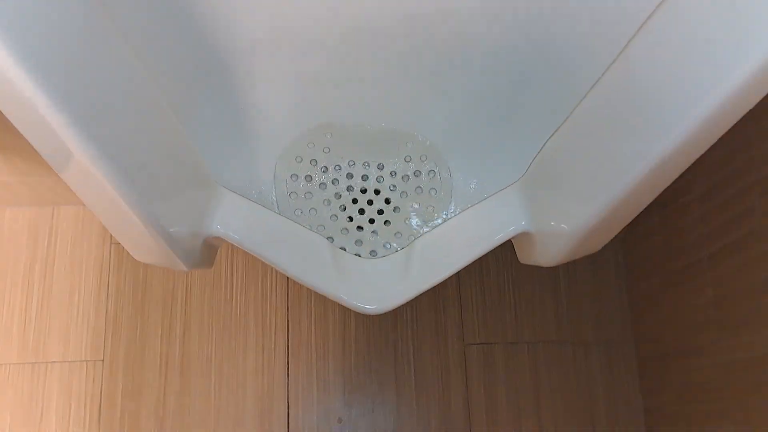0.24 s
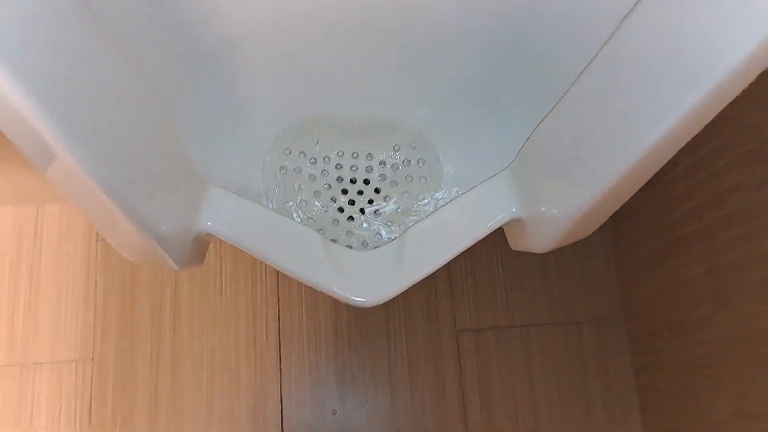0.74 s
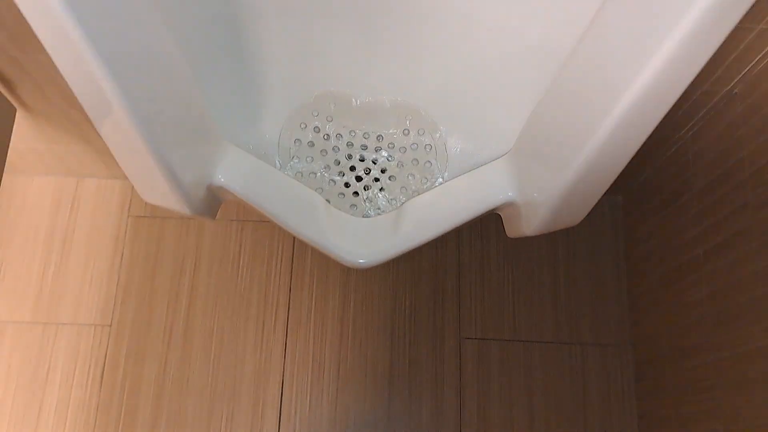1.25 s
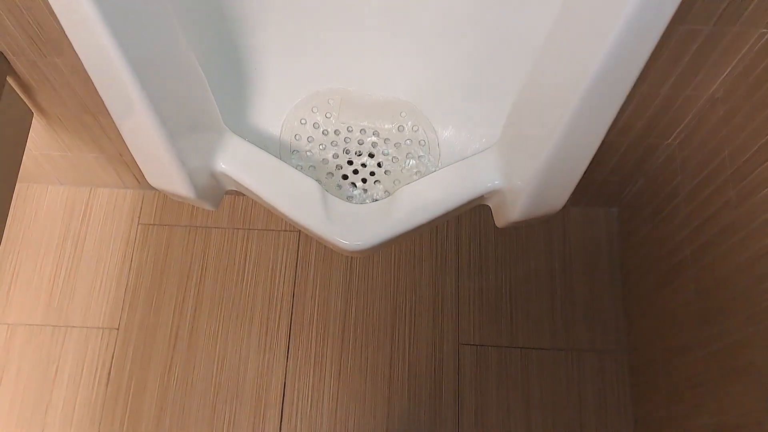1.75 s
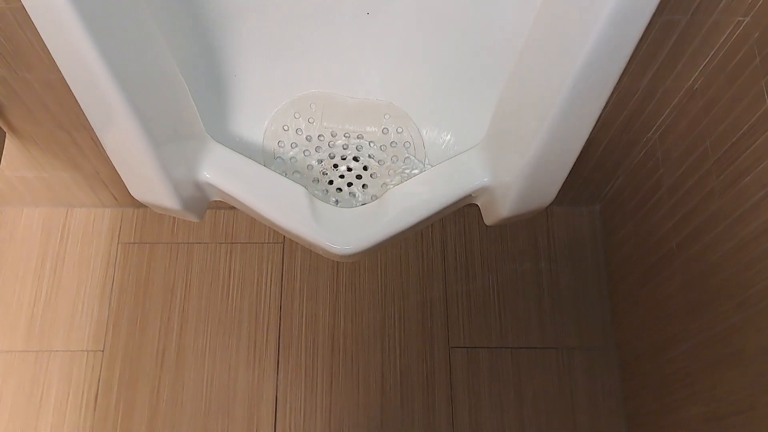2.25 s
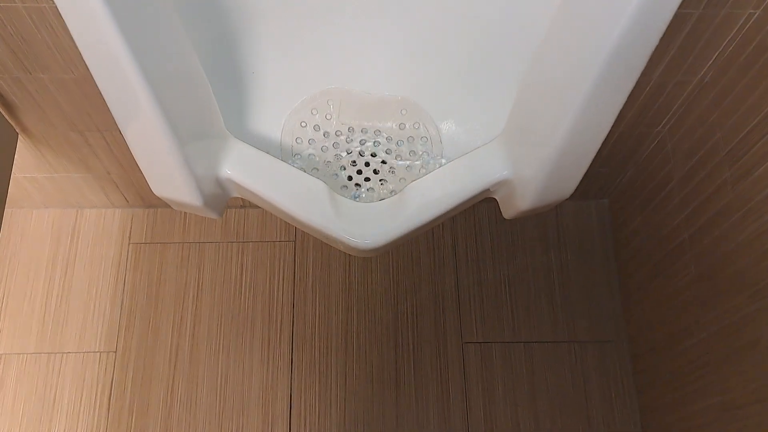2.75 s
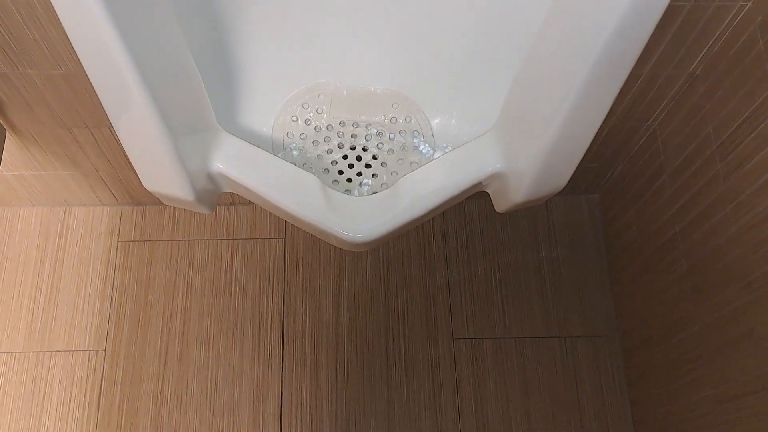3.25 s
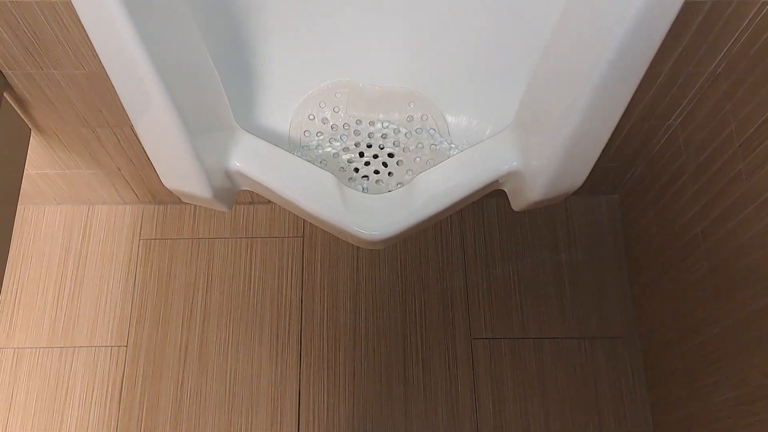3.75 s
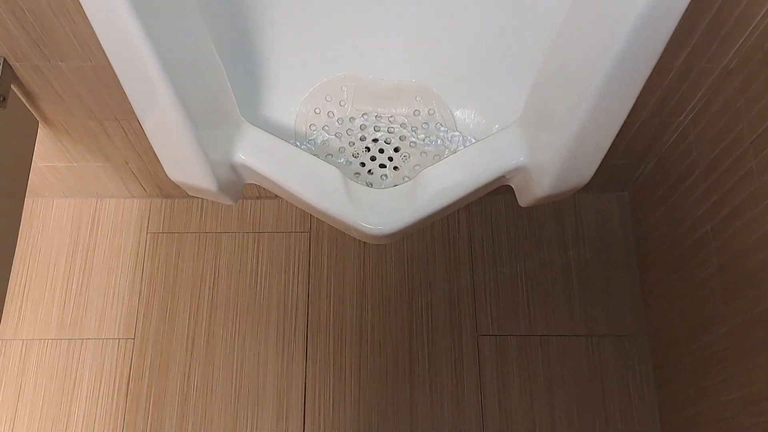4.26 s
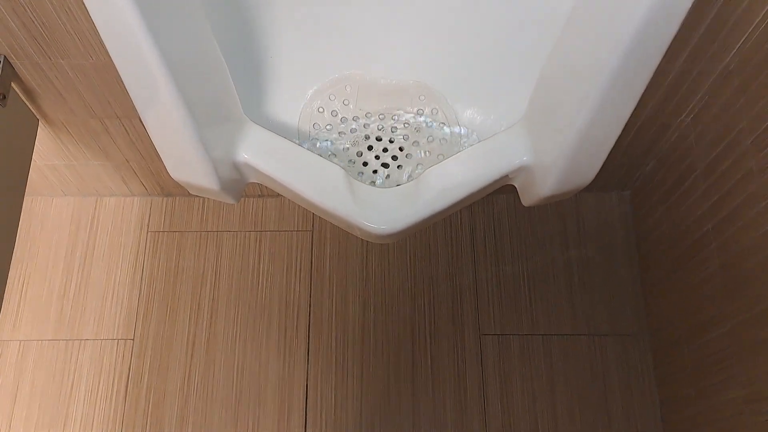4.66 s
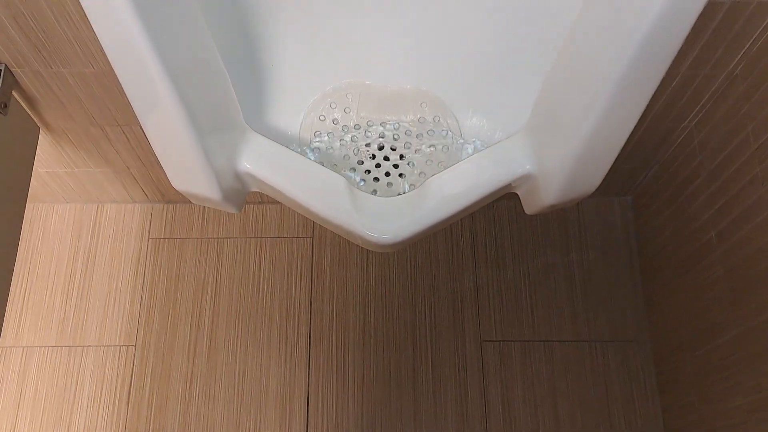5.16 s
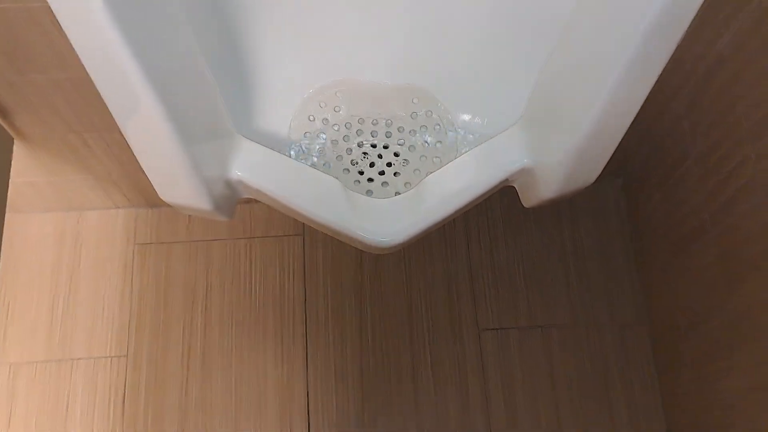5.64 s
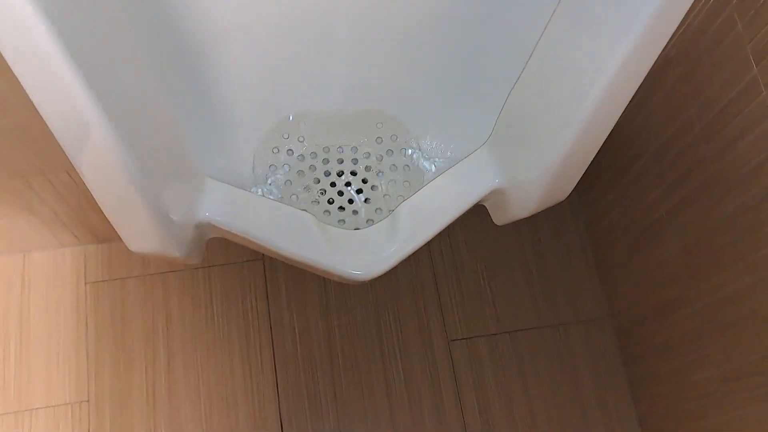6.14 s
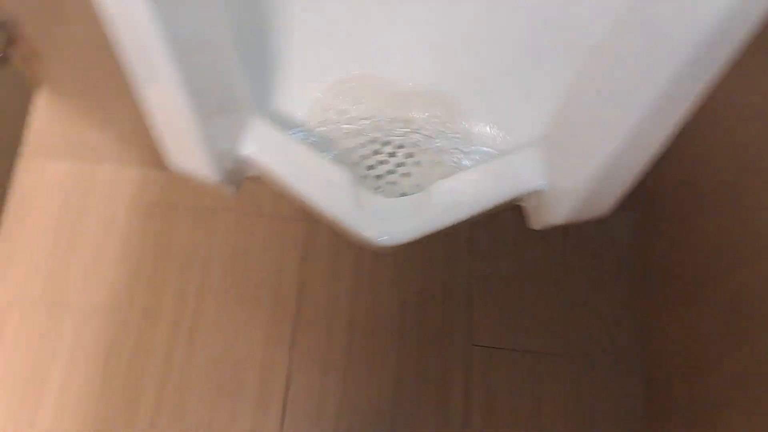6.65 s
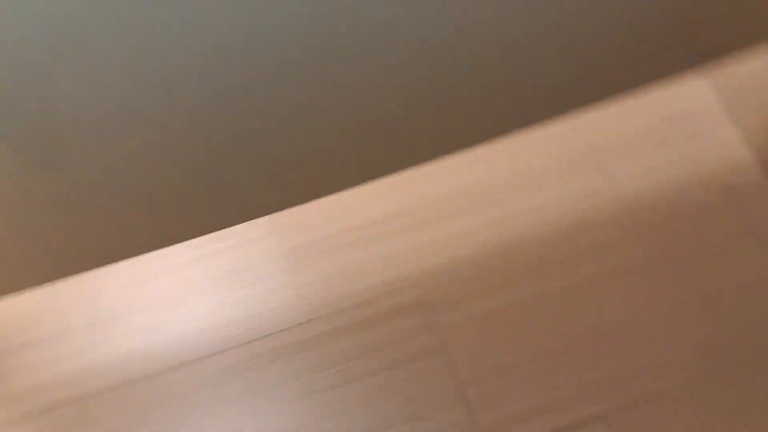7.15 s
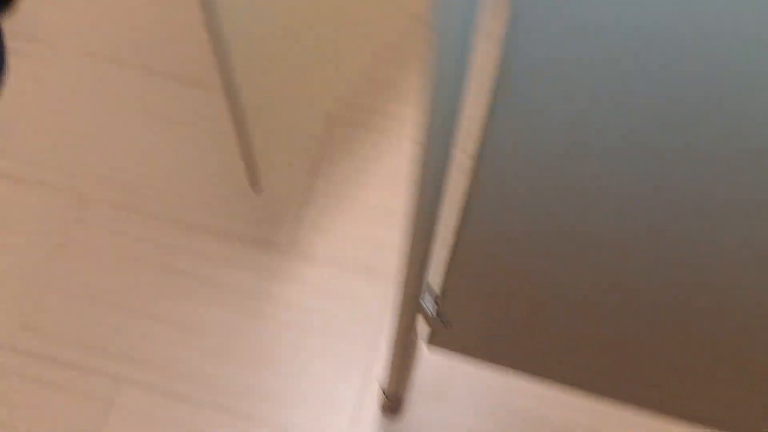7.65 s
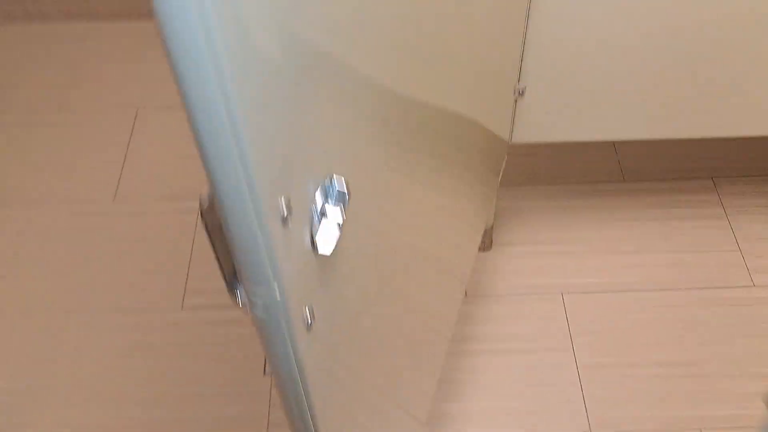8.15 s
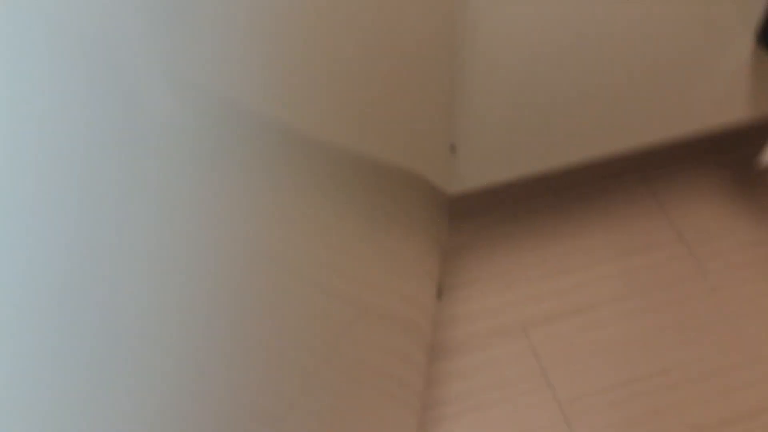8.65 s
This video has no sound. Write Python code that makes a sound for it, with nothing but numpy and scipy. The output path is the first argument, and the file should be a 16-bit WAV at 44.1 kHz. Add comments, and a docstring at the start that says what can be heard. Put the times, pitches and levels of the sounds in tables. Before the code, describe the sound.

A urinal flush valve hisses and whistles over dripping water, shuts off, the drain gulps and glugs, then shoes scuff and a stall door bumps.

```python
"""A tiled restroom with a urinal: the flush valve hisses and whistles while water drips, then it shuts.
The hiss is shaped noise, the whistles are noise in narrow resonances, and the drips are dying sines.
The trap gulps air: blows ring the drain pipe in hollow glugs, and swarms of bubbles make bright splashes.
Then shoes and a hand scuff (grainy noise) and a stall door ticks and bumps (short rings and a boom).
Under it all lies a low rumble of room air, made of low noise, swelling while the trap drains."""
import sys
import numpy as np
from scipy import signal
from scipy.fft import rfft, irfft, next_fast_len
from scipy.io import wavfile
from scipy.ndimage import uniform_filter1d

SR = 44100
rng = np.random.default_rng(int(sys.argv[2]) if len(sys.argv) > 2 else 0)


def generate_wav(sig):
    """Save sig (samples, or channels by samples) to the path in sys.argv[1] as 16-bit PCM at SR."""
    pcm = np.round(np.clip(np.atleast_2d(sig).T, -1, 1) * 32767).astype(np.int16)
    wavfile.write(sys.argv[1], SR, pcm)


N = 392490   # length in samples

# gulps of air in the trap: start_s, level_db, upper_modes_db (added to the level)
GULPS = [(5.231, -36.5, -15), (5.281, -44.5, 7), (5.322, -42.5, 6), (5.342, -41.5, 8), (5.386, -33, -1),
         (5.428, -25, -14), (5.486, -42, 4.5), (5.54, -26.5, -6), (5.564, -28.5, 5), (5.613, -30.5, 6.5),
         (5.656, -24, -13), (5.701, -19, -9), (5.748, -15.5, -8), (5.852, -24, -3), (5.948, -26, -9),
         (5.99, -34, 1), (6.119, -29, -32), (6.215, -24.5, -10.5), (6.263, -27, -9), (6.298, -32.5, 9),
         (6.365, -33, 2), (6.432, -30.5, -26), (6.486, -29, -38), (6.514, -34, -2), (6.587, -22.5, 0.5),
         (6.699, -39, 11), (6.74, -30, -25), (6.783, -22, -32), (7.103, -48, -20), (7.157, -36, -27)]
# splashes: start_s, level_db, large_bubbles_hz, small_bubbles_hz, small_bubbles_db, bright_edge_db
# (the last two are added to the level)
SPLASH_EVENTS = [(5.234, -68, 2580, 5200, 20.5, -15), (5.25, -50, 3710, 4390, 3.5, -1),
                 (5.32, -61.5, 2180, 5410, 7.5, -21), (5.3493, -47, 1890, 3900, -11, -2.5),
                 (5.368, -46, 1725, 4740, -30, -16), (5.3946, -48, 2940, 3820, -22, -37),
                 (5.4218, -64, 2670, 5400, 11, -11), (5.4528, -54.5, 1810, 4180, 4.5, 3.5),
                 (5.4867, -56.5, 1760, 5200, -1.5, -23), (5.545, -58, 1300, 5500, 1, -25),
                 (5.564, -46, 2230, 5570, 10, -5), (5.6162, -55.5, 1750, 5500, 12, -2),
                 (5.6536, -27.5, 2870, 3960, -1.5, -25), (5.707, -47, 2390, 4050, -8, -22),
                 (5.7437, -46.5, 2300, 5200, -2.5, -14), (5.843, -47, 1760, 6800, -2.5, -19),
                 (5.8576, -47.5, 1806, 4790, 6.5, 1), (5.901, -42.5, 1700, 4640, -24, -16),
                 (5.9436, -50.5, 1780, 4690, -7, -8.5), (5.9894, -59.5, 2310, 5390, 10.5, -4.5),
                 (5.97, -75, 2350, 4500, 0, 12), (6.004, -60, 1850, 4020, -1, 1),
                 (6.05, -60, 1640, 5180, 0, -20), (6.1178, -51.5, 2675, 5000, -18, -32),
                 (6.157, -53, 2265, 5500, -18, -22), (6.217, -50, 1870, 3670, -15, -12),
                 (6.144, -70, 3440, 6000, 1, -5), (6.237, -63, 3530, 7500, 4, 10),
                 (6.262, -51, 3170, 5880, -3, -14), (6.2983, -39, 1960, 7720, -0.5, 1),
                 (6.302, -39, 4740, 7800, 2.5, -10), (6.37, -56.5, 1690, 5400, -5.5, -4),
                 (6.492, -61, 2350, 5960, -2, -20), (6.514, -68, 2160, 5440, 11, -22),
                 (6.583, -54, 1820, 4940, -3, -14), (6.6076, -37, 2300, 5070, -4.5, -8),
                 (6.704, -54.5, 2260, 5450, -5.5, -0.5), (6.7844, -44, 2550, 4340, -24.5, -25),
                 (6.9, -68, 2550, 4530, -16, 6)]


def from_db(db):
    """Turn decibels into gain."""
    return 10 ** (np.asarray(db) / 20)


def mid_one(x):
    """Scale a sound so that the mean of its channels has rms 1."""
    return x / np.sqrt(np.mean(np.atleast_2d(x).mean(axis=0) ** 2) + 1e-20)


def in_time(rows, outside=None):
    """Draw straight lines between the rows of a table, giving each column a value at every sample."""
    s, *columns = np.transpose(rows)
    t = np.arange(N) / SR
    return [np.interp(t, s, column, outside, outside) for column in columns]


def at_hz(points, hz):
    """Read a spectrum table between its points, on a log-frequency axis."""
    point_hz, point_value = np.transpose(points)
    return np.interp(np.log(hz), np.log(point_hz), point_value)


def pan(db):
    """Give left and right gains for a left-minus-right level, held within 20 dB; their mean is 1."""
    left = 2 / (1 + from_db(-np.clip(db, -20, 20)))
    return np.array([left, 2 - left])


def drift(rate_hz):
    """Wander slowly at random around zero, with a spread of 1: low-passed noise."""
    step = 40   # computed on every 40th sample only
    r = np.exp(-2 * np.pi * rate_hz * step / SR)
    noise = rng.standard_normal(N // step + 2002)
    slow = signal.lfilter([1], [1, -2 * r, r * r], noise)[2000:]   # drop the filter's start
    return np.interp(np.arange(N) / step, np.arange(len(slow)), slow / slow.std())


def swells(s, db, rise_s, t60_s):
    """Add up the power of overlapping swells: each climbs 40 dB in rise_s, then falls 60 dB in t60_s."""
    step = 32   # computed on every 32nd sample only
    s, db, rise_s, t60_s = (np.reshape(value, (-1, 1)) for value in (s, db, rise_s, t60_s))
    t = np.arange(0, N, step)[None] / SR - s
    db_per_s = np.where(t < 0, 40 / rise_s, -60 / t60_s)
    power = np.sum(from_db(2 * (db + db_per_s * t)), axis=0)
    return np.interp(np.arange(N) / step, np.arange(len(power)), np.sqrt(power))


def coloured(spectrum, alike):
    """Make stereo noise with a given spectrum and left-right likeness, by shaping its frequencies."""
    size = next_fast_len(N)
    hz = np.maximum(np.arange(size // 2 + 1) * SR / size, 1)
    mid, side = rfft(rng.standard_normal((2, size)))
    likeness = np.clip(at_hz(alike, hz), -.95, .99)
    pair = np.sqrt(1 + likeness) * mid + np.sqrt(1 - likeness) * side * [[1], [-1]]
    return mid_one(irfft(pair * from_db(at_hz(spectrum, hz)), size)[:, :N])


def ring(x, hz, t60_s):
    """Pass a sound through a resonance: a unit click sets a dying sine of starting height 1 ringing."""
    r, w = from_db(-60 / (t60_s * SR)), 2 * np.pi * hz / SR
    return signal.lfilter([0, np.sin(w)], [1, -2 * r * np.cos(w), r * r], x + 1e-18)


def bubble(t, hz, t60_s, rise):
    """Sound a trapped bubble: a dying sine whose pitch climbs by twice the share rise each second."""
    t = np.maximum(t, 0)
    sine = np.sin(2 * np.pi * hz * t * (.98 + rise * t))
    return sine * from_db(-60 * t / np.maximum(t60_s, .004)) * (1 - np.exp(-t / 0.0032))


def splat(t, hz, cycles, t60_s, alike):
    """Burst into ragged droplets: stereo noise passed twice through a wide resonance, dying away."""
    mid, side = rng.standard_normal((2, len(t)))
    pair = mid + np.sqrt((1 - alike) / (1 + alike)) * side * [[1], [-1]]
    narrow = ring(ring(pair, hz, cycles / hz), hz, cycles / hz)
    return mid_one(narrow) * from_db(-60 * t / t60_s) * (1 - np.exp(-t / 0.0008))


def fizz(per_s, low_hz, high_hz, cycles, uneven_db, count):
    """Ring small bubbles born at random, of uneven size, each dealt one of count pitches and places."""
    born = rng.random(N) < per_s / SR
    size = from_db(uneven_db * np.minimum(rng.exponential(1, N), 4))
    clicks = born * size * rng.choice([-1, 1], N)
    dealt = rng.integers(0, count, N)
    places = pan(rng.normal(0, 4, count))
    total = np.zeros((2, N))
    for k, hz in enumerate(np.geomspace(low_hz, high_hz, count)):
        total += places[:, [k]] * ring(clicks * (dealt == k), hz, cycles / hz)
    return mid_one(total)


def add(out, s, sound):
    """Mix a stereo sound in at a time in seconds."""
    i = round(s * SR)
    out[:, i:i + sound.shape[1]] += sound[:, :N - i]


def room_air():
    """Rumble low as room air, swelling while the trap drains: low noise, nearly alike on both sides."""
    # level of the low rumble, raised while the trap drains: time_s, level_db
    air_level = [(0.0, -52), (2.43, -53), (3.12, -56), (3.72, -58), (4.14, -54.5), (5.2, -57.5),
                 (5.45, -49), (6.84, -43.5), (7.14, -61.5), (8.9, -60.5)]
    # colour of the rumble: pitch_hz, level_db (per Hz)
    rumble_colour = [(15, -37), (25, -5), (42, -1.5), (59, -2.5), (104, -5), (128, -9), (157, -7.5),
                     (191, -18), (214, -15.5), (275, -14), (325, -34), (358, -9), (401, -22), (467, -13),
                     (700, -47.5), (910, -56.5), (1540, -120)]
    level_db = in_time(air_level)[0] + 0.5 * drift(1.3)
    rumble = coloured(rumble_colour, [(60, 0.94), (300, 0.94), (700, 0.79)])
    return from_db(level_db) * rumble * pan(2.4)[:, None]


def bass_swells():
    """Ring noise in one deep resonance, swelling slowly now and then."""
    # swells of the deep bass: top_s, level_db
    swell_tops = [(0.05, -48), (0.5, -56), (1.45, -56), (2.3, -53), (3.35, -52), (3.95, -52), (4.25, -43.5)]
    s, db = np.transpose(swell_tops)
    bass = mid_one(ring(rng.standard_normal(N), hz=58.4, t60_s=0.25))
    return bass * swells(s, db, rise_s=0.61, t60_s=0.8)


def steady_floor():
    """Lay a faint, steady bed of shaped noise under everything."""
    # colour of the bed: pitch_hz, level_db (per Hz)
    floor_colour = [(180, -50), (300, 7.5), (379, -30), (412, 3), (440, -19.5), (828, -19.5), (1810, -24),
                    (2170, -18), (5800, -30.5), (13300, -29), (16000, -20.5)]
    return from_db(-68) * coloured(floor_colour, [(300, 0.47), (3000, .1)])


def moves():
    """Rub soles, cloth and a hand as grainy noise; the door panel booms as noise in two low resonances."""
    # soles and hand scuffing: top_s, sliding_hiss_db, sole_scuff_db, treble_db, rise_s, t60_s
    scuff_events = [(7.624, -53.5, -63, -61.5, 0.21, 0.57), (7.716, -61, -63, -80, 0.021, 1),
                    (7.95, -63.5, -70, -71, 0.56, 0.77), (8.114, -44.5, -43.5, -49.5, 0.12, 0.64),
                    (8.332, -52.5, -59, -76, 0.099, 0.8), (8.5, -52, -65, -49, 0.38, 0.3),
                    (8.54, -35, -43, -56, 0.038, 0.42), (8.574, -36, -45, -44.5, 0.11, 0.17),
                    (8.8, -56.5, -72, -64, 1, 0.91)]
    # weight landing on floor and door: top_s, dull_rub_db, door_boom_db, rise_s, t60_s
    bump_events = [(7.494, -46.5, -65, 0.0099, 0.98), (7.56, -62, -49.5, 0.1, 0.63),
                   (7.716, -65, -50, 0.1, 0.25), (7.95, -61, -70, 0.04, 0.6), (8.028, -60, -51, 0.26, 0.4),
                   (8.176, -47.5, -58, 0.25, 0.84), (8.345, -48.5, -55, 0.11, 1.0),
                   (8.374, -49, -35, 0.052, 1.36), (8.514, -47, -45, 0.24, 0.6),
                   (8.57, -41, -55, 0.12, 0.45), (8.78, -55.5, -47.5, 0.5, 0.65),
                   (8.85, -50, -64, 0.1, 1.1)]
    # colours of sole scuff, dull rub and sliding hiss: pitch_hz, level_db (per Hz)
    scuff_colour = [(470, -27), (800, -5.5), (1180, -6.5), (1380, -3), (1550, -7), (1990, -3), (2100, -8),
                    (2730, -23), (4620, -120)]
    rub_colour = [(71, -36), (120, -2.5), (270, -4), (389, -8), (471, -6.5), (588, -13), (748, -12),
                  (1200, -19), (1560, -23), (2600, -24.5), (5000, -60)]
    slide_colour = [(1240, -19.5), (2100, -5), (2150, -7), (2730, -4), (3110, -8.5), (4540, -9),
                    (5990, -19), (7000, -20), (9100, -31), (15400, -120)]
    treble_colour = [(5500, -21.0), (7000, -3.0), (9200, 0), (12000, 1.0), (15500, -1)]

    s, rub_db, boom_db, rise_s, t60_s = np.transpose(bump_events)
    panel = rng.standard_normal(N)
    boom = mid_one(ring(panel, 56.0, 0.18) + 0.21 * ring(panel, 82, 0.063))
    boom = boom * swells(s, boom_db, rise_s, t60_s)
    rub = coloured(rub_colour, [(150, 0.93), (1000, 0.49)]) * from_db(1.7 * drift(22))
    rub = rub * swells(s, rub_db, rise_s, t60_s)

    s, slide_db, scuff_db, treble_db, rise_s, t60_s = np.transpose(scuff_events)
    scuff = coloured(scuff_colour, [(700, 0.17), (3000, 0.049)]) * from_db(2.0 * drift(40))
    scuff = scuff * swells(s, scuff_db, rise_s, t60_s)
    slide = coloured(slide_colour, [(2000, 0.16), (4000, 0.067)]) * swells(s, slide_db, rise_s, t60_s)
    treble = coloured(treble_colour, [(20, .05), (20000, .05)]) * swells(s, treble_db, rise_s, t60_s)
    grain = from_db(0.61 * drift(60))
    return boom + rub + pan(0.88)[:, None] * (scuff + grain * (slide + treble))


def ticks():
    """Tap small hard contacts: a click rings short high modes over a dull body."""
    # dry ticks: start_s, level_db, body_db (added to the level), left_minus_right_db
    tick_events = [(7.1085, -50, 6, -19), (7.1391, -49, 5, -26.5), (7.4904, -67, 10, 3),
                   (7.5048, -69, 27, -5), (7.5494, -65, 28, -5.0), (7.7199, -41, -2, 1),
                   (7.7556, -51.5, -9, 6), (7.9645, -37.5, -3, 38), (7.974, -36, -5.5, 20),
                   (8.324, -41, -11, 3), (8.8312, -60, 22.5, -1), (8.867, -57, 18.5, -9)]
    # ringing of a tick: pitch_hz, level_db, t60_s
    tick_modes = [(1300, -12, 0.015), (2410, 8.5, 0.0031), (4000, 6.5, 0.0036), (5500, -14.5, 0.0026),
                  (10700, -3, 0.0025)]
    out = np.zeros((2, N))
    click = np.eye(1, round(.08 * SR))[0]   # a single 1, then zeros
    for s, db, body_db, pan_db in tick_events:
        tick = from_db(body_db) * ring(click, 520, 0.014)
        for hz, mode_db, t60_s in tick_modes:
            own_db = rng.normal(0, 1)   # every tick differs a little
            tick = tick + from_db(mode_db + own_db) * ring(click, hz, t60_s)
        add(out, s, from_db(db) * pan(pan_db)[:, None] * tick)
    return out


def valve():
    """Hiss a smooth jet of noise with narrow whistles, over a broad wash and a bubbly trickle."""
    # flow through the flush valve, as the level of its hiss: time_s, level_db
    flow_level = [(0.0, -45.5), (0.64, -46), (0.92, -44), (2.3, -46.5), (2.73, -46.5), (3.79, -48.5),
                  (4.39, -46.5), (4.85, -48), (5.09, -57), (5.25, -88)]
    # colours of the hiss and of water down the porcelain: pitch_hz, level_db (per Hz)
    hiss_colour = [(710, -51), (1200, -30), (1430, -30), (1560, -6), (1830, -6.5), (2510, 0), (3150, -13.5),
                   (4500, -6.5), (6100, -15), (7100, -8.5), (8910, -9), (11800, -9), (13000, -0.5),
                   (13900, -12), (16000, -14)]
    wash_colour = [(1000, -25), (1400, -0.5), (3000, 9.5), (5500, 17.5), (9500, -6.5), (11500, -2),
                   (16000, -13)]
    # how alike left and right are: pitch_hz, likeness (1 = same, 0 = unrelated, below 0 = opposed)
    likeness = [(600, 0.071), (1200, -0.13), (1800, 0.87), (2300, 0.25), (2900, -0.048), (8000, -0.023),
                (11000, 0.035), (13500, -0.23)]
    # pipe and nozzle whistles: pitch_hz, width_hz, level_db
    whistle_modes = [(984, 44, -25), (1594, 24, -18.5), (1806, 37, -10), (1960, 220, -9), (2237, 29, -14.5),
                     (6520, 11, -28), (7000, 32, -22), (13000, 280, -7.5), (15400, 300, -19)]

    flow_db, = in_time(flow_level, outside=-120)
    t = np.arange(N) / SR
    runs_dry_s, runs_dry_t60_s = 5.21, 0.13   # trickle and wash stop after the valve
    dry_db = -60 * np.maximum(t - runs_dry_s, 0) / runs_dry_t60_s
    trickle_db = -62.5 - 2.5 * t + 2 * drift(1.44) + dry_db   # start, fade per second, waver
    wash_db = -57.5 - 1.5 * t + 0.7 * drift(1.3) + dry_db

    jet = coloured(hiss_colour, likeness) * from_db(-2.5 + 0.8 * drift(22))
    white = coloured([(20, 0), (20000, 0)], likeness)
    for hz, width_hz, db in whistle_modes:
        t60_s = 2.6 / width_hz   # the narrower, the longer it rings
        whistle = mid_one(ring(ring(white, hz, t60_s), hz, .5 * t60_s))
        jet = jet + from_db(db + 1.6 * drift(2.1)) * whistle

    flicker_db = drift(15)
    wash = coloured(wash_colour, likeness) * from_db(wash_db + flicker_db)
    trickle = fizz(600.0, 543, 1740, 8.4, uneven_db=1.5, count=12)
    return from_db(flow_db) * jet + from_db(trickle_db) * trickle + wash


def drips():
    """Ring one bubble for each drip or plop, with a splat that is stronger the higher the pitch."""
    # clear drips, and bubbles plopping during the drain: start_s, level_db, bubble_hz
    drips_and_plops = [(0.028, -43, 990), (0.14, -41, 2900), (0.312, -44, 5500), (0.48, -33.5, 2430),
                       (0.512, -30.5, 7100), (0.605, -36, 2516), (0.867, -22, 1860), (0.887, -40, 3060),
                       (0.908, -38, 2620), (0.931, -29.5, 3260), (0.933, -35.5, 5500), (0.998, -39, 5500),
                       (1.006, -31.5, 4450), (1.066, -42.5, 1045), (1.104, -35, 1760), (1.137, -33.5, 1784),
                       (1.486, -34, 1820), (1.538, -41, 3000), (1.673, -43, 1290), (1.766, -33.5, 2030),
                       (1.787, -43, 1363), (1.83, -37, 2446), (1.854, -46, 930), (1.99, -33, 2154),
                       (2.107, -43, 4100), (2.264, -48, 910), (2.569, -37, 4100), (2.878, -40, 5500),
                       (2.99, -42, 4900), (3.061, -39, 2500), (3.275, -40.5, 4100), (3.651, -42, 4270),
                       (3.665, -48, 884), (3.806, -47.5, 860), (3.868, -41, 1410), (3.898, -44, 1390),
                       (4.119, -43, 3450), (4.214, -34.5, 4790), (4.321, -43, 1370), (4.513, -38.5, 6700),
                       (4.517, -43, 1250), (4.607, -34.5, 3660), (4.78, -35.5, 2450), (4.844, -39, 3630),
                       (5.121, -43.5, 4160), (5.323, -46, 1006), (5.531, -50, 1200), (5.563, -42.5, 944),
                       (5.653, -53, 920), (5.837, -45, 1210), (5.86, -52, 740), (5.991, -49, 1010),
                       (7.041, -46, 2440)]
    out, t = np.zeros((2, N)), np.arange(round(.15 * SR)) / SR
    when, pitch, size = rng.random(size=(24, 3)).T   # faint drips at random
    low_hz, high_hz, end_s = 729, 1490, 4.0
    faint_db = -59 + 7 * (size - .5)
    faint = np.transpose([when * end_s, faint_db, low_hz * (high_hz / low_hz) ** pitch])
    for s, db, hz in np.vstack([drips_and_plops, faint]):
        t60_s = 0.056 * (2000 / hz) ** 0.59   # higher bubbles die sooner
        impact_db = -4.0 + 1.6 * np.log2(hz / 2000)
        impact = from_db(impact_db) * splat(t, hz, 20.0, 0.85 * t60_s, alike=0.13)
        add(out, s, from_db(db) * (bubble(t, hz, t60_s, rise=1.0) + impact))
    return out


def spatters():
    """Slap water on the porcelain: short bursts of noise in a very wide resonance."""
    # slaps: start_s, level_db
    slap_events = [(0.4817, -47), (0.844, -42), (0.865, -41), (0.93, -47), (0.946, -50), (1.0044, -42.5),
                   (1.5369, -68), (1.6497, -42), (1.9184, -40), (2.1044, -39), (4.215, -63), (4.513, -53.5),
                   (4.6058, -59)]
    out, t = np.zeros((2, N)), np.arange(round(.12 * SR)) / SR
    for s, db in slap_events:
        add(out, s, from_db(db) * splat(t, hz=4200, cycles=1.8, t60_s=0.059, alike=.5))
    return out


def upper_surge():
    """Swell the churning in the upper pipe modes with every gulp, as a gain."""
    s, db, upper_db = np.transpose(GULPS)
    return swells(s, db + upper_db - 18, rise_s=0.0067, t60_s=0.36)


def drain():
    """Hum the drain pipe's modes with noise for turbulence, and strike them with gulps of air."""
    # flow down the trap: time_s, lowest_modes_db, middle_modes_db
    trap_flow = [(5.2, -80, -106), (5.24, -50, -47), (5.32, -41.5, -48.5), (5.56, -38, -53),
                 (5.92, -39.5, -46), (6.29, -41.5, -65), (6.4, -54, -61), (6.56, -39.5, -54.5),
                 (6.66, -49, -52), (6.8, -44, -43), (6.91, -60.5, -68), (6.99, -43.5, -57),
                 (7.09, -64.5, -68.5), (7.18, -55.5, -50), (7.3, -80, -86.5)]
    # drain pipe modes: pitch_hz, level_db, t60_s
    pipe_modes = [(59.75, 2, 0.78), (95.6, -4, 0.59), (120, -27.5, 0.17), (157.2, 0.5, 1),
                  (221.7, 1.5, 0.31), (286.5, -8.5, 1), (380, -6, 0.055), (466.2, -0.5, 0.11),
                  (500, -38, 0.11), (700, -12.5, 0.032)]
    s, gulp_db, upper_db = np.transpose(GULPS)
    low_db, middle_db = in_time(trap_flow, outside=-120)
    low, upper = from_db(low_db), upper_surge()
    middle = from_db(middle_db) + swells(s, gulp_db - 19, rise_s=0.026, t60_s=0.12)

    at = np.round((s - 0.009) * SR).astype(int)   # a gulp starts to swell before its time
    spread_db = rng.normal(0, 2, (len(s), len(pipe_modes)))
    churn, pipe = rng.standard_normal(N), np.zeros(N)
    blow = np.hanning(round(0.017 * SR))   # a gulp swells over some milliseconds
    blow = blow / blow.sum()
    for k, (hz, db, t60_s) in enumerate(pipe_modes):
        flow = low if hz < 110 else middle if hz < 330 else upper
        hum = ring(churn, hz, t60_s)
        power = uniform_filter1d(hum ** 2, size=SR // 8)
        hum = hum / (power + 1e-9) ** 0.28   # the flow holds the swing nearly steady
        pipe += from_db(db) * flow * mid_one(hum)
        if hz > 110:   # the lowest modes are not struck
            share_db = upper_db - 1.5 if hz > 330 else -8
            clicks = np.zeros(N)
            clicks[at] = from_db(gulp_db + share_db + db + spread_db[:, k])
            swing = np.cos(2 * np.pi * hz * np.arange(len(blow)) / SR)
            strikes = signal.oaconvolve(clicks, 2 * blow * swing)[:N]
            pipe += ring(strikes, hz, 0.3 * t60_s)
    soft = signal.butter(3, 700, fs=SR, output="sos")   # water strikes softly
    return signal.sosfilt(soft, pipe)


def spray():
    """Spray grainy noise and a dense patter of droplets, with larger bubbles plopping in the trap."""
    # changing spray in the trap: time_s, level_db
    spray_level = [(5.2, -73), (5.23, -60), (5.7, -64.5), (6.1, -64), (6.5, -64.5), (6.72, -59.5),
                   (6.82, -45.5), (6.91, -58), (7.11, -64), (7.3, -83)]
    # colour of the spray: pitch_hz, level_db (per Hz)
    spray_colour = [(350, -37), (600, -14), (1010, -9.5), (1290, -18), (1750, -7), (1930, -10.5),
                    (2270, -0.5), (3480, -16.5), (4840, -8), (5630, -18), (8990, -16), (11700, -17.5),
                    (16000, -17)]
    s, db = np.transpose(SPLASH_EVENTS)[:2]
    spray_gain = from_db(in_time(spray_level, outside=-120)[0])
    after = swells(s, db - 6.5, rise_s=0.01, t60_s=0.23)   # each splash leaves spray behind
    mist = coloured(spray_colour, [(600, 0.55), (1400, 0.14), (3000, .1)]) * from_db(-3.0 + 1.5 * drift(30))
    droplets = from_db(-8) * fizz(350.0, 1650, 5700, 45.0, uneven_db=3.0, count=14)
    plops = upper_surge() * from_db(-28.5) * fizz(45.0, 696, 970, 22.0, uneven_db=3.5, count=6)
    dull = signal.sosfilt(signal.butter(2, 7000, fs=SR, output="sos"), mist + droplets)
    return spray_gain * (mist + droplets) + after * dull + plops


def splashes():
    """Make each splash a swarm of large and small bubbles in ragged droplets, with a bright edge."""
    out, t = np.zeros((2, N)), np.arange(round(.25 * SR)) / SR
    follows = np.arange(12)[:, None] > 1   # the first pair opens the splash on time and on pitch
    t60_s = 0.064
    for s, db, large_hz, small_hz, small_db, edge_db in SPLASH_EVENTS:
        late, detune, size, side = rng.standard_normal((4, 12, 1))
        late_s = 0.047 * t60_s * late ** 2 * follows
        hz = np.tile([large_hz, small_hz], 6)[:, None] * np.exp(0.075 * detune * follows)
        # late bubbles are weaker
        gain = from_db(np.tile([0, small_db], 6)[:, None] + 3.3 * size - 60 * late_s / t60_s)
        swarm = pan(3.1 * side[:, 0]) @ (gain * bubble(t - late_s, hz, t60_s, rise=1.0))
        large_drops = splat(t, large_hz, 15.0, 0.78 * t60_s, alike=0.41)
        small_drops = from_db(small_db) * splat(t, small_hz, 8, 1.4 * t60_s, alike=0.08)
        edge = from_db(edge_db) * splat(t, 11000, 4.5, t60_s, alike=-0.35)
        splash = swarm + from_db(2.5) * (large_drops + small_drops) + edge
        add(out, s, from_db(db) * splash * (1 - np.exp(-t / 0.00041)))
    # splashes sound thin below about 1450 Hz
    thin = signal.butter(3, 1450, "high", fs=SR, output="sos")
    return signal.sosfilt(thin, out)


def restroom(x):
    """Echo off the tiles: six feedback delays a side, duller on every round, stepped block by block."""
    t60_s, wall_cut_hz = 0.26, 4300
    out, dull = np.zeros((2, N)), np.exp(-2 * np.pi * wall_cut_hz / SR)
    lags = (rng.uniform(0.0061, 0.034, 12) * SR).astype(int)
    for k, lag in enumerate(lags):
        loop, gain, state = x.copy(), from_db(-60 * lag / SR / t60_s), [0.]
        for i in range(lag, N, lag):
            back, state = signal.lfilter([gain * (1 - dull)], [1, -dull], loop[i - lag:i], zi=state)
            loop[i:i + lag] += back[:N - i]
        out[k % 2] += (loop - x) * (-1) ** (k // 2)   # echoes only, signs alternating
    return out


def scene():
    """Mix the water and door sounds in the tiled room, over its air."""
    sharp = drips() + spatters() + splashes() + spray() + ticks()
    pipe = drain()
    echoes = from_db(-11.0) * restroom(sharp.mean(axis=0) + .3 * pipe)
    background = room_air() + bass_swells() + steady_floor()
    return sharp + pipe + echoes + valve() + moves() + background


def record(dry):
    """Hear through two ports of unequal colour; the deep bass is rolled off and the top cut steeply."""
    # the left port is shaded: pitch_hz, left_minus_right_db
    port_balance = [(60, 3), (92, -3.5), (140, 1), (210, 2), (330, -0.5), (500, 1), (770, 3), (1170, -2.5),
                    (1790, -2.5), (2740, -16), (4190, -4), (6410, -18), (9810, -1), (15000, -9.5)]
    size = next_fast_len(N + 4096)
    hz = np.maximum(np.arange(size // 2 + 1) * SR / size, 1)
    ports = irfft(rfft(dry, size) * pan(at_hz(port_balance, hz)), size)[:, :N]
    notched = signal.lfilter(*signal.iirnotch(9200, 4.0, SR), ports)
    ports = notched * 0.46 + ports * 0.39   # a dip of the port cavity
    ports = signal.sosfilt(signal.butter(4, 46, "high", fs=SR, output="sos"), ports)
    return signal.sosfilt(signal.ellip(12, .5, 75, 15800, fs=SR, output="sos"), ports)


dry = scene()
out = record(dry)
generate_wav(out)
```